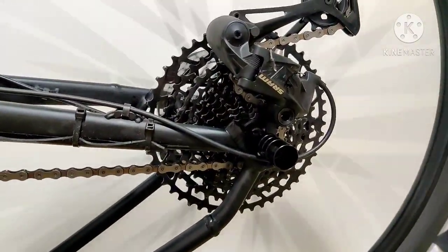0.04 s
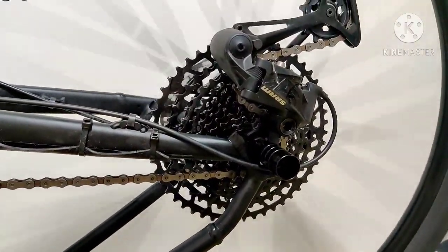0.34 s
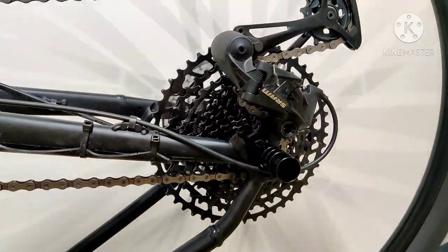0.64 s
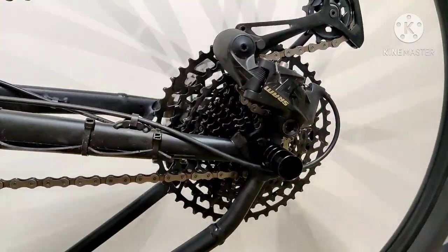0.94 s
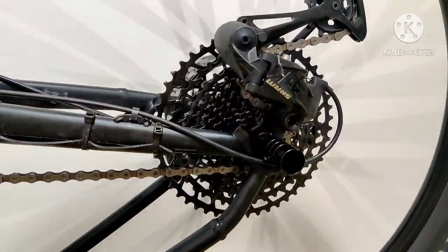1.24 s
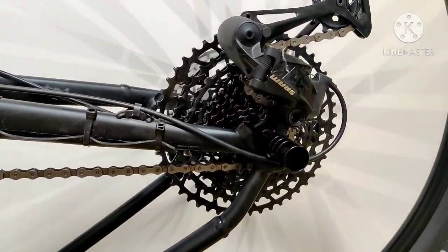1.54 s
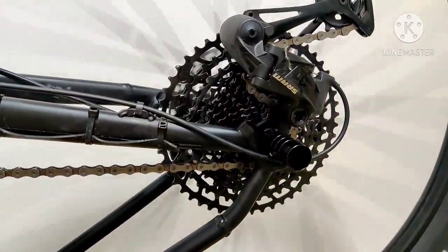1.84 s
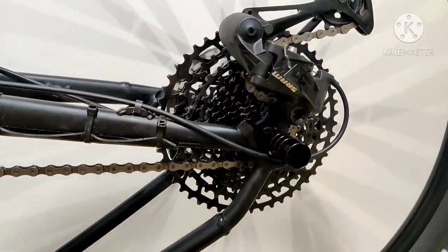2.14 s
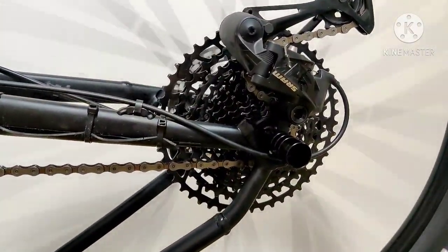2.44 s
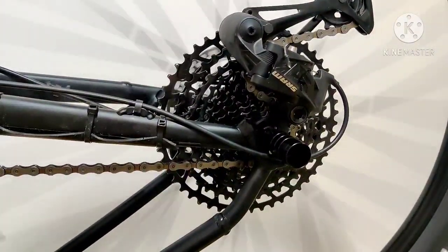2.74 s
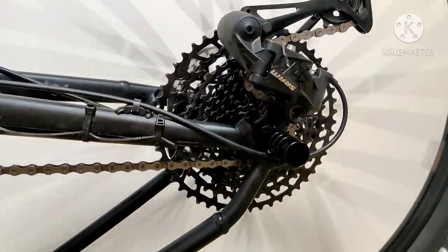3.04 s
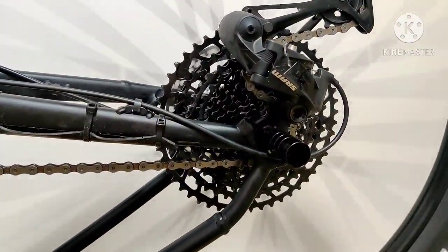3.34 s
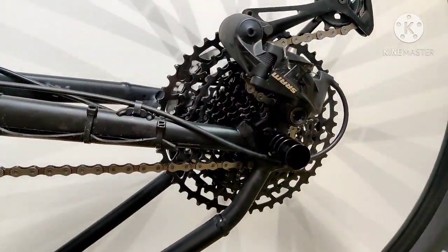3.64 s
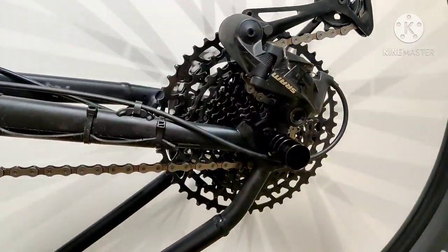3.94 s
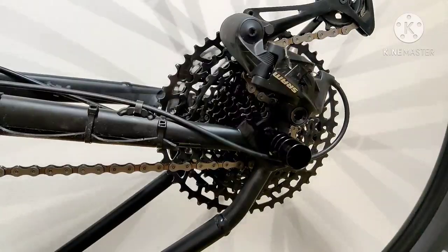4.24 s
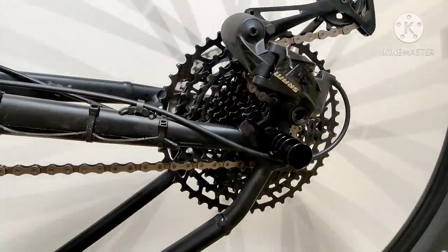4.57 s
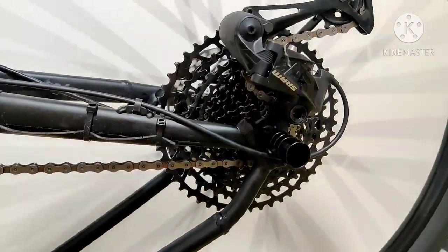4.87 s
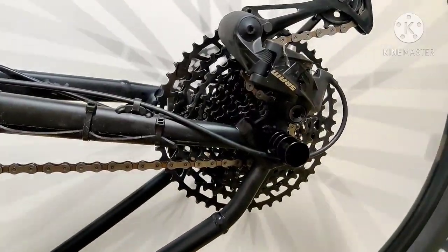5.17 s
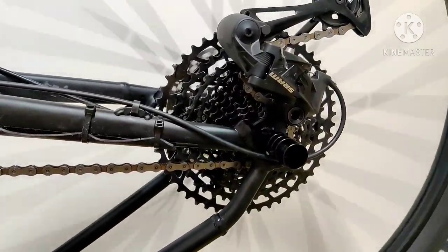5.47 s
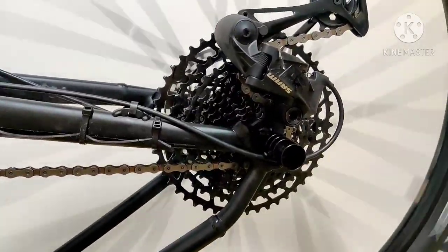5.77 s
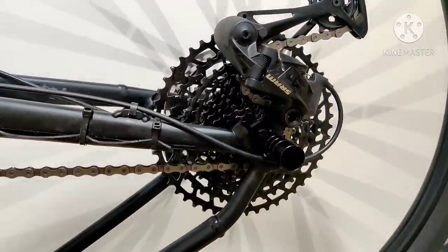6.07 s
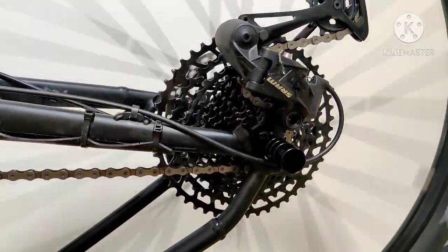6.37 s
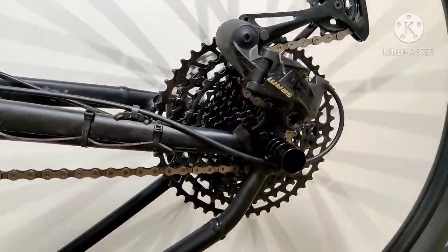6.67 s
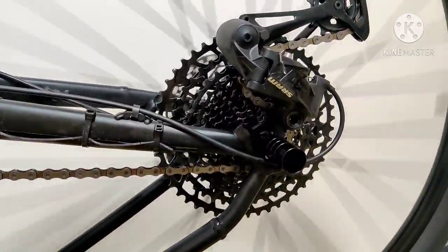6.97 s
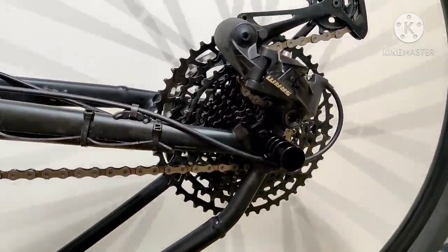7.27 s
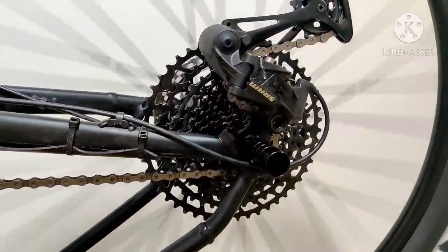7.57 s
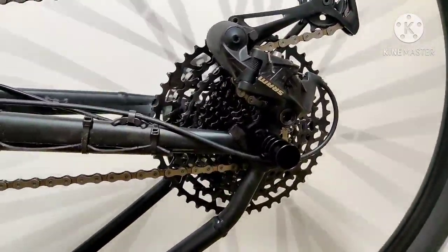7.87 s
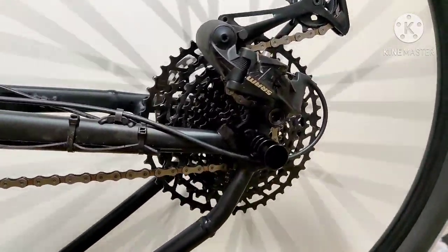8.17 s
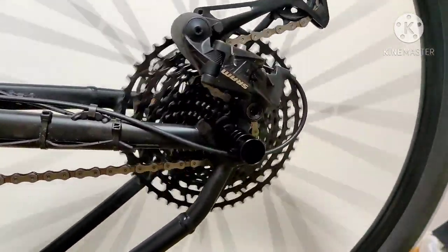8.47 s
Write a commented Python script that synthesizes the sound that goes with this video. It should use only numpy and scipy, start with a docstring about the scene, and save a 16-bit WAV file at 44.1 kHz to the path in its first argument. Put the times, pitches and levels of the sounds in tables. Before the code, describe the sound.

Rapid, crisp clicking from a freely spinning bicycle wheel gradually slows, then quickens at the very end, in a small room.

```python
"""Bicycle freehub in a small room

A rear wheel coasts down near a wall, on a stereo pair of microphones; at the end the snaps quicken. Three pawls
drop together off each of fifteen ratchet teeth; every snap rings hub, sprockets and frame. Each tooth has its
own colour, so a pattern comes round with every turn. Underneath are a wavering low hum, the faint rush of the
spokes and room tone."""
import sys
import numpy as np
from scipy import signal
from scipy.fft import rfft, irfft, next_fast_len
from scipy.io import wavfile
from scipy.ndimage import map_coordinates

SR = 44100
rng = np.random.default_rng(int(sys.argv[2]) if len(sys.argv) > 2 else 0)


def pcm_store(signal):
    """Save signal as 16-bit PCM."""
    levels = np.round(np.clip(np.atleast_2d(signal), -1, 1) * 32767)
    wavfile.write(sys.argv[1], SR, levels.astype(np.int16).T)


N = 379683

TEETH, START_TOOTH = 15, .459  # teeth per turn; share of the first tooth already climbed
START_RATE, FRICTION, DRAG = 35.743, 1.4717, .0003436  # teeth/s; bearings, teeth/s^2; air, per tooth
SNAP_DB, SNAP_DB_PER_DOUBLING = -1.64, -0.06  # snap trim at starting speed; change as speed doubles
LEAD_S = .003  # time allowed ahead of a snap for the pawls to slip
TOOTH_COLOUR, REGION_OCTAVES = 1.1, 0.34  # depth of a tooth's colour; half width of a hub resonance

# the hub's resonant regions: knock_hz, clack_hz, ping_hz, ring_hz
HUB_REGIONS = [1990, 2840, 4260, 5880]
# each tooth's snap: strength_db, then (scaled by TOOTH_COLOUR) knock_db, clack_db, ping_db, ring_db
RATCHET_TEETH = [(0.07, 0, -2.5, 2.5, -0.5), (-0.3, 5.5, 0.5, 6, -3.1), (1, -0.9, -1.5, 0.5, -1),
                 (-1.95, -0.4, 5, 3.8, 3.5), (0.5, 4, 1.5, 0.5, -2.9), (2.06, 4.1, -1.2, 2.7, -1.5),
                 (1.0, 1.5, -4, 5, -2.4), (0.8, -0.7, -0.8, 3.5, -1.3), (-0.5, 2.7, -2, -3.5, 4),
                 (-0.56, 1, -1.2, 2.5, 1), (1.36, -3, 2.7, -1.5, -1.5), (1.0, -1, 1.2, -0.5, -3),
                 (1.7, -2.8, -1.6, 0.2, -5.5), (0, 2, -2.5, 1.5, -1), (-0.4, 3.3, -1, 6.7, -1.5)]
# moments when the snaps sound louder or softer: centre_s, half_width_s, extra_db
SNAP_ACCENTS = [(.11, .03, 2), (.6, 0.026, -2), (.73, 0.021, -2.5), (.91, 0.084, 1.5), (1.345, 0.037, -3),
                (1.88, 0.064, 0.5), (2.03, .015, -1.5), (2.27, 0.031, 2.7), (2.41, .045, 1.5),
                (2.76, .015, -2.3), (3.11, 0.053, -2.7), (3.41, 0.021, 4), (3.53, 0.022, -3.5),
                (3.92, 0.069, -1), (4.08, .015, -1.5), (4.33, .015, 1), (4.47, 0.018, 1.5),
                (4.74, 0.031, 1), (5.01, .028, 3), (5.41, .015, -3), (5.49, .015, 1), (6.02, 0.12, -1),
                (6.4, .02, 0.6), (6.6, 0.049, -2.5), (6.75, 0.06, -0.5), (7.15, 0.11, -1),
                (7.66, 0.14, 0.3), (8.014, .015, 0.5), (8.08, .045, -1), (8.25, 0.068, 2),
                (8.39, 0.031, -1)]
# the teeth passing faster at the close: time_s, extra_teeth_per_s
CLOSING_EXTRA_RATE = [(8.155, 0), (8.26, 2.5), (8.32, 6.1), (8.61, 10.9)]
# the hub's colour at the left and at the right microphone: frequency_hz, relative_db
HUB_AT_LEFT_MIC = [(100, -54), (400, -30.5), (1500, -29), (2200, -22), (2750, -17.5), (3700, -20),
                   (4400, -18.5), (5000, -10.5), (5800, -3), (6800, -9.5), (7600, -13.5), (8700, -20),
                   (12000, -17), (15200, -15.5)]
HUB_AT_RIGHT_MIC = [(100, -71), (400, -45), (1500, -28.5), (2200, -24.5), (3000, -20.5), (3800, -23.5),
                    (4900, -19.5), (6200, -11), (8400, -11.5), (9600, -3), (10300, 0), (11100, -7.5),
                    (12000, -5.5), (15200, -15.5)]
# modes of frame, spokes and sprockets: pitch_hz, relative_db, t60_s, left_over_right_db
FRAME_MODES = [(421, -18, 0.11, 5), (640, -10.5, .1, 5), (830, -24, 0.091, -2), (990, -6, 0.034, 6),
               (1377.4, -4, .065, 10.5), (1610, -14, 0.1, 6), (1825, -10, 0.096, 1), (1897, -11, .06, 5),
               (2030, -12.5, 0.041, 7), (2265, -6.5, 0.033, 10), (2653, 2.5, 0.023, 12.5),
               (2792, 0, 0.021, 2.5), (3225, -7, .02, -1), (4100, -23, 0.018, 3), (4912, 4, 0.015, -2),
               (5597, 7, 0.016, 9), (5710, 7.5, 0.024, 8), (5950, 3.5, 0.018, 10), (6380, 0, .022, 18),
               (7595, 3, 0.066, 3), (10020, -14, 0.035, -13)]
# the room's decay: frequency_hz, t60_s
ROOM_DECAY = [(300, 0.16), (1500, 0.16), (5000, 0.12), (10000, 0.24), (15000, 0.44)]
# strength of the room's answer: frequency_hz, gain_db
REVERB_GAIN = [(500, 0), (1500, 0), (3000, 1.5), (3900, -1), (6000, -4.5), (10000, -6), (15000, -9)]
# the hum's drift: time_s, pitch_hz, level_db
HUM_DRIFT = [(0.0, 168.0, -59.5), (0.24, 174.6, -43), (0.33, 171.3, -57), (0.45, 174.2, -44.5),
             (0.65, 172.0, -53), (0.74, 182.3, -57), (0.98, 173.6, -53.5), (1.34, 170.9, -52),
             (1.46, 179.0, -42), (1.55, 179.6, -56), (1.96, 175.1, -47), (2.47, 170.4, -50.5),
             (2.61, 178.1, -46.5), (2.66, 176.2, -69), (2.7, 177.3, -47), (3.09, 173.3, -53),
             (3.26, 182.3, -54), (3.33, 182.3, -69), (3.45, 172.7, -50), (3.71, 175.6, -57),
             (3.9, 176.7, -46.5), (4.0, 178.6, -62), (4.19, 175.4, -44), (4.33, 179.2, -69),
             (4.43, 179.6, -46), (4.5, 179.9, -58), (4.6, 170.4, -54.5), (5.29, 172.4, -52.5),
             (5.48, 168.0, -64), (5.51, 168.0, -51), (5.6, 174.2, -47), (5.72, 171.9, -65),
             (5.84, 169.2, -54), (6.39, 177.1, -58), (6.7, 170.9, -53), (6.85, 172.6, -44.5),
             (7.09, 178.7, -54.5), (7.54, 172.1, -50.5), (8.41, 173.0, -56.5), (8.6, 173.6, -46)]
# air stirred by the spokes: frequency_hz, relative_db
SPOKE_SPECTRUM = [(80, -14), (245, 3), (310, -4), (450, -2.5), (800, -7), (2000, -23), (8000, -46)]
# room tone: frequency_hz, relative_db
ROOM_TONE_SPECTRUM = [(10, -13), (23, 3), (38, -12.5), (56, -0.5), (68, -13.5), (82, -5.5), (125, -20.5),
                      (160, -5.5), (235, -13), (310, -10.5), (380, -21), (900, -18), (3000, -12.5),
                      (15000, -22.5)]
# how alike diffuse noise is at the two microphones: frequency_hz, correlation
MIC_LIKENESS = [(50, 0.79), (150, 1), (300, 0.69), (600, .75), (2000, 0.13)]
# the recorder's band edge: frequency_hz, gain_db
RECORDER_BAND = [(15250, 0), (15900, -20), (16500, -28), (16650, -90)]


def freehub(stagger_s, left_db, right_db, chatter_db, frame_db, frame_sway_db, pawl_count=3):
    """Direct sound at the microphones: pawls land a split millisecond apart and ring hub and frame."""
    times, sizes = snaps(scatter_db=0.5)
    tooth = np.arange(len(times)) % TEETH
    push = tooth_pushes()[tooth]

    def on_snaps(shapes):
        pushed = signal.fftconvolve(unit_energy(shapes), push, axes=1)
        return impulses(times - LEAD_S, sizes, pushed)

    pawls = [pawl(tooth, lag_s=k * stagger_s) for k in range(pawl_count)]
    hub_rings = 0
    for blows in pawls:
        answers = np.stack([hub() for _ in range(TEETH)], axis=1)  # alike on every turn
        hub_rings += signal.fftconvolve(blows[None], answers[:, tooth], axes=2)
    ticks = at_mics(rattle(times, sizes, delay_s=.014, db=-20.5, uneven_db=7.5), hub())
    buzz = amp(chatter_db) * chatter(on_snaps(sum(pawls)), t60=0.0078)
    clicks = mic_gains(left_db, right_db) * (np.array([on_snaps(mic) for mic in hub_rings]) + ticks + buzz)
    # the heavy frame feels each snap as one blow; how well it arrives sways as the wheel turns
    knocks = impulses(times, sizes, push) * amp(frame_sway_db * wobble(20))
    return clicks + amp(frame_db) * at_mics(knocks, frame(build_up_s=0.009, build_up_hz=1010))


def tooth_rate():
    """Teeth per second: the wheel loses FRICTION + DRAG * rate^2 each second, and the teeth pass faster still
    at the end."""
    knee = np.sqrt(FRICTION / DRAG)
    coasting = knee * np.tan(np.arctan(START_RATE / knee) - DRAG * knee * np.arange(N) / SR)
    return coasting + curve(CLOSING_EXTRA_RATE)


def snaps(scatter_db):
    """Time and size of each snap: one as each tooth passes, with that tooth's own strength."""
    rate = tooth_rate()
    passed = START_TOOTH + np.cumsum(rate) / SR
    tooth = np.arange(int(passed[-1]))
    at = np.searchsorted(passed, tooth + 1)
    times = at / SR
    speed_db = SNAP_DB + SNAP_DB_PER_DOUBLING * np.log2(rate[at] / START_RATE)
    tooth_db = np.array(RATCHET_TEETH)[tooth % TEETH, 0]
    accent_db = sum(db * np.exp(-((times - centre) / half) ** 2) for centre, half, db in SNAP_ACCENTS)
    return times, amp(speed_db + tooth_db + accent_db + scatter_db * rng.standard_normal(len(times)))


def pawl(tooth, lag_s, spread_s=.00018, uneven_db=1.0, slip_s=.0007, slip_db=-10,
         bounce_s=.0022, bounce_db=-4.5, chance=.1, size=512):
    """One pawl's blows, a row per snap: it slips over the tooth's edge, lands and bounces twice."""
    # most of the scatter is wear that comes round with each tooth, the rest is chance
    wear = rng.standard_normal((TEETH, 6))[tooth]
    scatter = (wear + chance * rng.standard_normal((len(tooth), 6))).T / np.hypot(1, chance)
    landing = LEAD_S + lag_s + spread_s * scatter[0]
    force_db = uneven_db * scatter[1]
    slip = landing - slip_s * np.exp(.4 * scatter[2])
    flight = bounce_s * np.exp(.35 * scatter[3])
    touches = [(slip, slip_db), (landing, 0), (landing + flight, bounce_db + 2 * scatter[4]),
               (landing + 1.8 * flight, 2 * bounce_db + 2 * scatter[5])]
    return sum(amp(db + force_db)[:, None] * (np.arange(size) == np.round(s * SR)[:, None])
               for s, db in touches)


def tooth_pushes(size=256):
    """Each tooth's short push: its wear and place in the ring favour some of the hub's resonances."""
    def regions(hz):
        octaves = np.log2((hz[:, None] + 1) / np.array(HUB_REGIONS))
        return np.exp(-(octaves / REGION_OCTAVES) ** 2)

    return np.array([coloured(np.ones(1), lambda hz: TOOTH_COLOUR * regions(hz) @ colour_db, size)
                     for colour_db in np.array(RATCHET_TEETH)[:, 1:]])


def hub(left_t60=0.021, right_t60=0.019, crack_db=-7, crack_t60=0.0078, rise_s=0.00013, size=1500):
    """The hub's answer to one blow: a crack, then dense steel modes that die within milliseconds."""
    t = np.arange(size) / SR
    crack = amp(crack_db - 60 * t / crack_t60)
    attack = 1 - np.exp(-t / rise_s)
    burst = lambda t60: rng.choice([-1, 1], size) * (amp(-60 * t / t60) + crack) * attack
    return hub_colour(burst(left_t60), burst(right_t60))[:, :size]


def hub_colour(left, right):
    """Two bursts coloured as each microphone hears the hub, at energy 1."""
    return unit_energy(np.array([coloured(left, lambda hz: along(HUB_AT_LEFT_MIC, hz)),
                                 coloured(right, lambda hz: along(HUB_AT_RIGHT_MIC, hz))]))


def frame(build_up_s, build_up_hz):
    """Longer-lived modes, each with its own level and phase at each microphone; low ones build slowly."""
    t = np.arange(SR // 4) / SR
    ring = 0
    for hz, db, t60, lean_db in FRAME_MODES:
        attack = 1 - np.exp(-t / build_up_s * (hz / build_up_hz) ** 2)
        decay = amp(-60 * t / t60) / np.sqrt(t60)
        tone = np.sin(2 * np.pi * (hz * t + rng.random((2, 1))))
        ring += mic_gains(db, db - lean_db) * attack * decay * tone
    return ring / np.linalg.norm(ring[0])


def chatter(blows, t60):
    """The loose sprockets and chain buzz after each blow, never twice alike."""
    energy = signal.lfilter([1], [1, -amp(-120 / (t60 * SR))], blows ** 2)
    envelope = np.sqrt(energy * np.sum(blows ** 2) / np.sum(energy))
    buzz = envelope * rng.choice([-1, 1], (2, N))
    return signal.oaconvolve(buzz, hub_colour(np.ones(1), np.ones(1)), axes=1)[:, :N]


def rattle(times, sizes, delay_s, db, uneven_db, count=3):
    """Each snap shakes loose parts, which tick faintly some milliseconds later."""
    scatter = rng.standard_normal((len(times), 2, count))
    tick_times = times[:, None] + delay_s * np.exp(.55 * scatter[:, 0])
    tick_sizes = sizes[:, None] * amp(db + uneven_db * np.tanh(scatter[:, 1]))
    return impulses(tick_times.ravel(), tick_sizes.ravel(), np.ones((1, 1)))


def wall(direct, delay_s, db):
    """The first reflection to reach the microphones, off the wall just behind the wheel."""
    return filtered(direct, lambda hz: amp(db) * np.exp(-2j * np.pi * hz * delay_s))


def reverb(direct, build_up_s, block=4096):
    """The room's diffuse tail builds up as the walls answer; the turning spokes keep reshuffling it."""
    starts = np.arange(0, N, block)
    hz, t, noise = signal.stft(rng.standard_normal((len(starts), 2, SR // 4)), SR, nperseg=256)
    t60 = along(ROOM_DECAY, hz)[:, None]
    tails = signal.istft(noise * (amp(-60 * t / t60) / np.sqrt(t60)), SR, nperseg=256)[1]
    tails *= 1 - np.exp(-(np.arange(tails.shape[-1]) / SR / build_up_s) ** 2)
    wet = np.zeros((2, N + SR))
    for start, tail in zip(starts, tails):
        answer = signal.fftconvolve(direct[:, start:start + block], tail / np.linalg.norm(tail[0]), axes=1)
        wet[:, start:start + answer.shape[1]] += answer
    return filtered(wet[:, :N], lambda hz: amp(along(REVERB_GAIN, hz)))


def hum(wander_rad, flutter_rad, throb, left_db, right_db):
    """A continuous low tone that wavers in pitch and level and throbs with brief dips."""
    rows = np.array(HUM_DRIFT)
    pitch_hz, level_db = curve(rows[:, [0, 1]]), curve(rows[:, [0, 2]])
    phase = 2 * np.pi * np.cumsum(pitch_hz) / SR + wander_rad * wobble(14) + flutter_rad * wobble(40)
    tone = unit_rms((1 + throb * wobble(24)) * np.sin(phase))
    return mic_gains(left_db, right_db) * amp(level_db) * tone


def spokes(db, db_per_doubling):
    """The spokes stir the air: a soft rush, left of centre, that follows the wheel's speed."""
    level_db = db + db_per_doubling * np.log2(tooth_rate() / START_RATE)
    return amp(level_db) * mic_gains(2, -2) * diffuse(SPOKE_SPECTRUM)


def room_tone(left_db, right_db):
    """The room's faint, steady noise, mostly rumble."""
    return mic_gains(left_db, right_db) * diffuse(ROOM_TONE_SPECTRUM)


def diffuse(spectrum):
    """Noise of rms 1, nearly the same at both microphones in the bass."""
    def mid_and_side(hz):
        angle = np.arccos(np.clip(along(MIC_LIKENESS, hz), -1, 1)) / 2
        return amp(along(spectrum, hz)) * [np.cos(angle), np.sin(angle)]

    mid, side = filtered(rng.standard_normal((2, N)), mid_and_side)
    return unit_rms(np.array([mid + side, mid - side]))


def amp(db):
    """Decibels to gain."""
    return 10 ** (np.asarray(db) / 20)


def mic_gains(left_db, right_db):
    """A gain for each microphone."""
    return amp([[left_db], [right_db]])


def unit_rms(x):
    """Scale to rms 1."""
    return x / np.sqrt(np.mean(x ** 2) + 1e-20)


def unit_energy(x):
    """Scale each row to energy 1."""
    return x / np.linalg.norm(x, axis=-1, keepdims=True)


def along(points, hz):
    """(frequency_hz, value) points read on a log axis."""
    knots_hz, values = np.transpose(points)
    return np.interp(np.log(hz + 1), np.log(knots_hz + 1), values)


def curve(rows):
    """(time_s, value) rows as one value per sample."""
    return np.interp(np.arange(N) / SR, *np.transpose(rows))


def wobble(rate):
    """A smooth random curve, rate knots a second."""
    return map_coordinates(rng.standard_normal(int(N * rate / SR) + 4), [np.arange(N) * rate / SR])


def filtered(x, response):
    """x through the frequency response given by response(hz)."""
    size = next_fast_len(N + SR // 2)
    return irfft(rfft(x, size) * response(np.fft.rfftfreq(size, 1 / SR)), size)[..., :N]


def coloured(x, db, size=4096):
    """A short burst through the causal filter whose gain is db(hz)."""
    cepstrum = irfft(np.log(amp(db(np.fft.rfftfreq(size, 1 / SR)))))
    cepstrum[1:size // 2] *= 2
    cepstrum[size // 2 + 1:] = 0
    return irfft(rfft(x, size) * np.exp(rfft(cepstrum)))


def impulses(times, sizes, shapes):
    """A train of single blows, each with its own short shape."""
    at = np.round(times * SR).astype(int)[:, None] + np.arange(shapes.shape[1])
    return np.bincount(np.clip(at, 0, N).ravel(), (sizes[:, None] * shapes).ravel(), N + 1)[:N]


def at_mics(x, responses):
    """One signal through the impulse response to each microphone."""
    return np.array([signal.oaconvolve(x, response)[:N] for response in responses])


def scene():
    """The ratchet and its reflections, over the spokes, the hum and the room tone."""
    direct = freehub(stagger_s=.00028, left_db=6.5, right_db=10.0, chatter_db=-7,
                     frame_db=-2.5, frame_sway_db=0.85)
    reflections = wall(direct, delay_s=0.0047, db=-19.5) + reverb(direct, build_up_s=0.0024)
    background = hum(wander_rad=0.5, flutter_rad=0.39, throb=0.38, left_db=2.5, right_db=-2.5)
    background += room_tone(left_db=-42.5, right_db=-47.0)
    return direct + reflections + spokes(db=-54, db_per_doubling=16.5) + background


def record(dry):
    """The recorder rounds off the highest peaks and keeps nothing above its band edge."""
    ceiling = .95  # of full scale
    rounded = dry / (1 + (dry / ceiling) ** 12) ** (1 / 12)
    return filtered(rounded, lambda hz: amp(along(RECORDER_BAND, hz)))


dry = scene()
out = record(dry)
pcm_store(out)
```